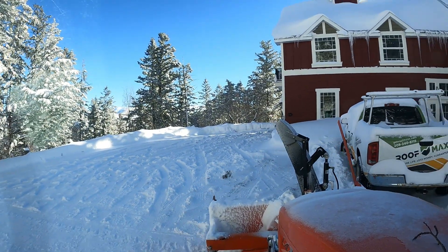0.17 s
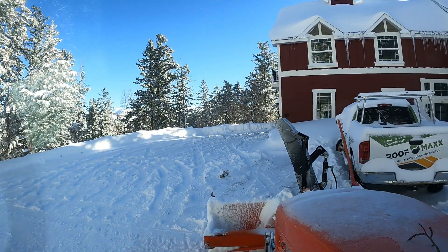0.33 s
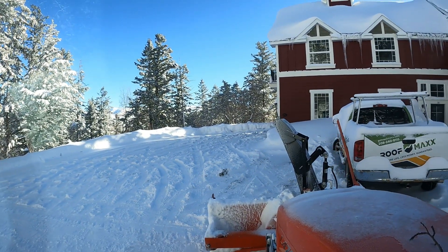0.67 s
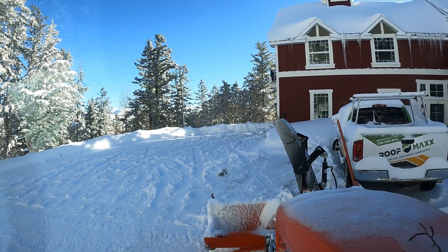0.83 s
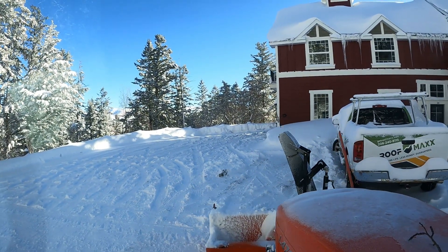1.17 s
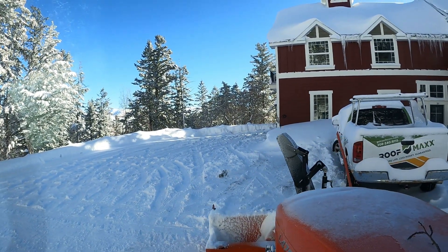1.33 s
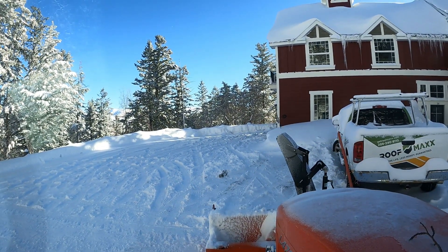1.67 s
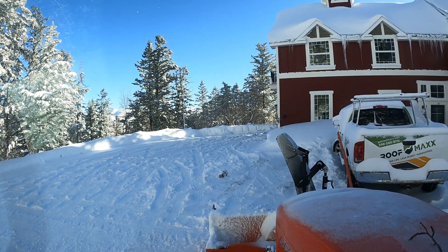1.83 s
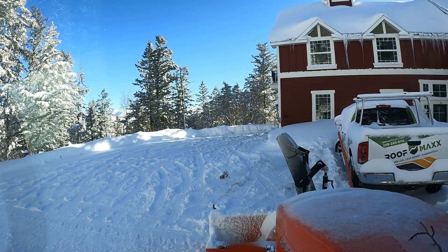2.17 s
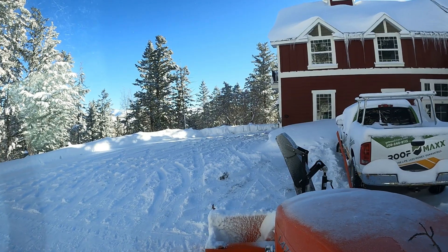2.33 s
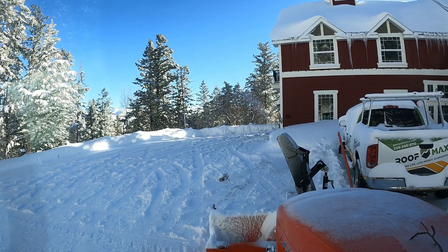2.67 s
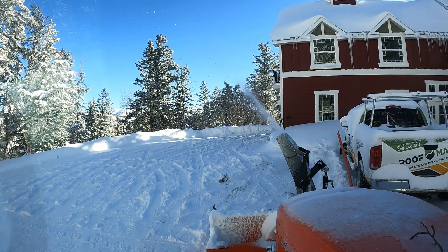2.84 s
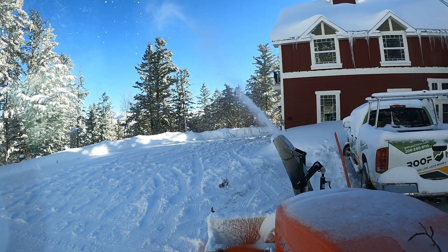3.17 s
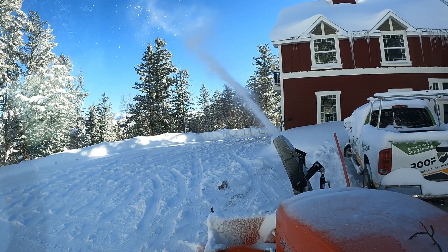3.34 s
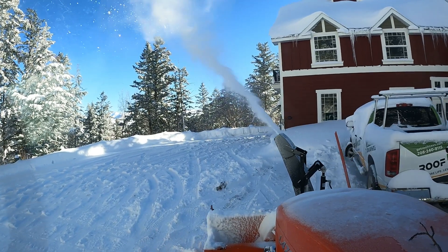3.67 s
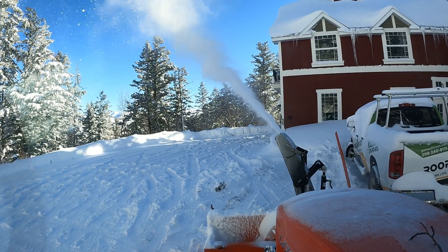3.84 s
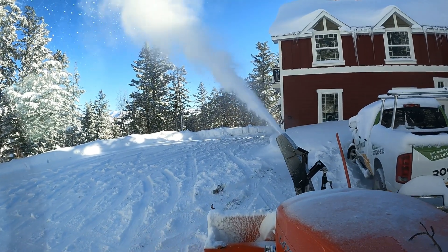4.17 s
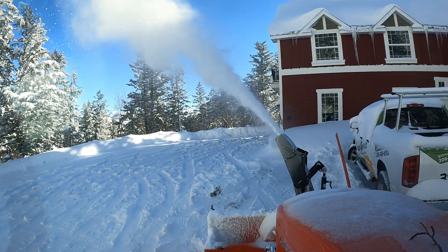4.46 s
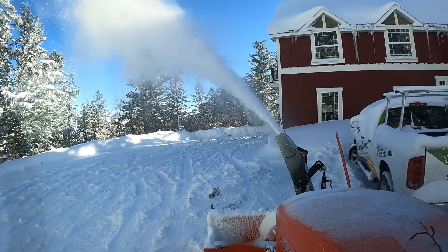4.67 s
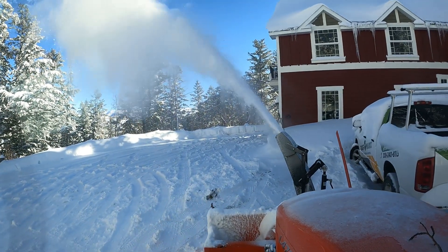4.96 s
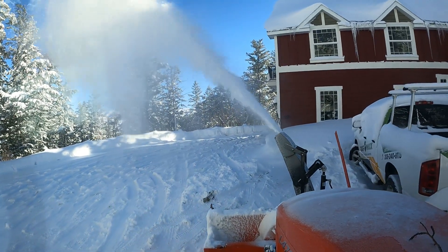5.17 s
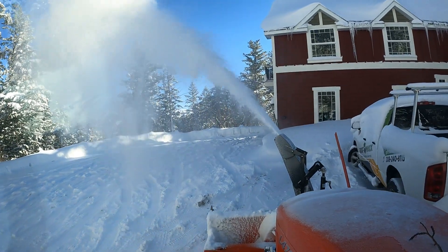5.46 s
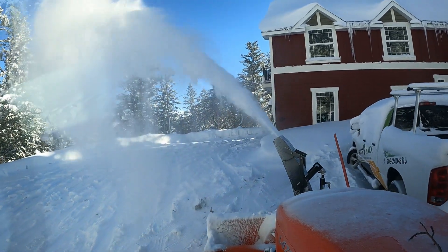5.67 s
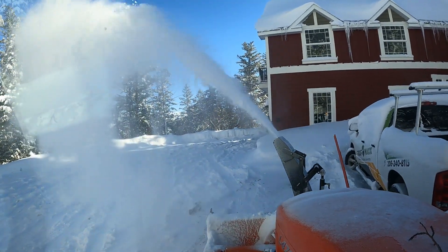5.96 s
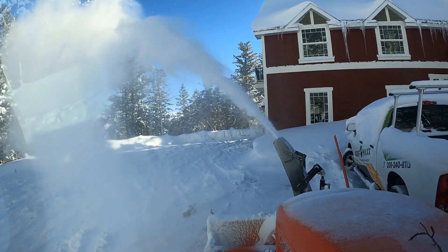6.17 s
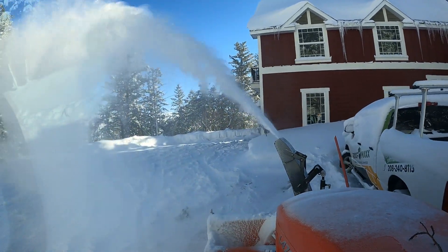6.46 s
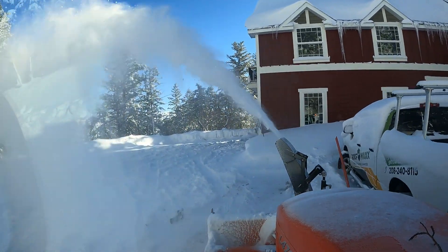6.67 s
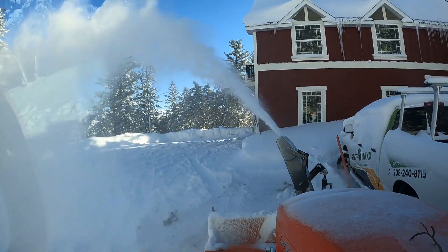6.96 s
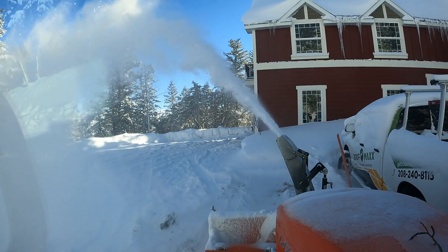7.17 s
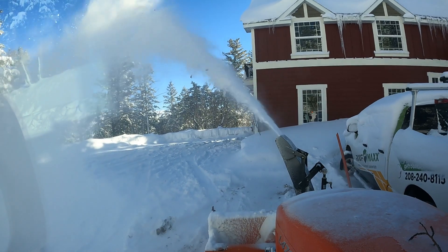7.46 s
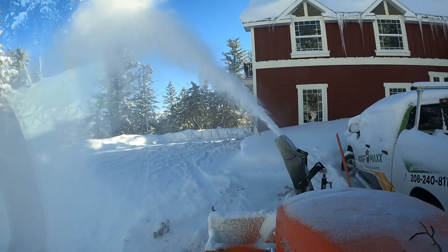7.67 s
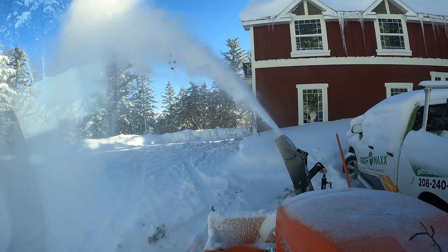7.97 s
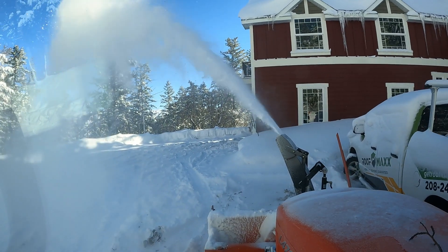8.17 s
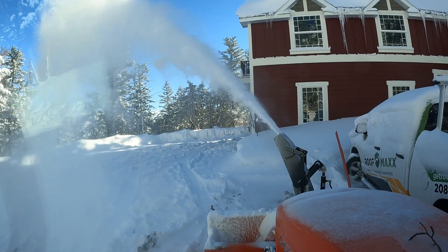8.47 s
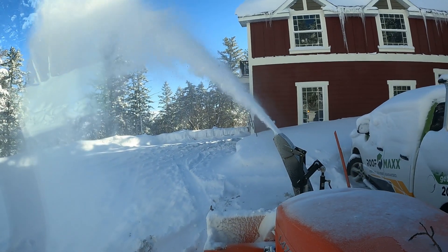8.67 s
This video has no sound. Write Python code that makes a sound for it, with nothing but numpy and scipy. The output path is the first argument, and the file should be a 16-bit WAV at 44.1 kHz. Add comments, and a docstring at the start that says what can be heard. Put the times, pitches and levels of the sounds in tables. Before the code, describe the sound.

Steady tractor and snow blower noise fills a small cab: low uneven rumble, humming panels, muffled broadband roar and a mid-pitched pump whine. Early on, hard lever knocks come in pairs and bursts, the last with dry squeaking and scraping, and the sound ducks slightly before recovering. The machine continues alone until a compact rattle of clunks and light ticks past the middle, then drones on to the end. Close stereo microphone inside.

```python
"""A four-cylinder tractor engine driving a snow blower, heard inside the closed cab.
Engine orders, pump whine and gear tones are wavering sines locked to the shaft; the roar is coloured noise
that beats with the firings and comes dull through the glass. The cab booms and shakes as noise-driven modes.
Levers and loose fittings knock, squeak and scrape now and then: noise bursts, decaying or sustained modes.
After some of the lever work the whole level dips and creeps back."""
import sys
import numpy as np
from scipy import signal
from scipy.fft import rfft, irfft, next_fast_len
from scipy.io import wavfile
from scipy.ndimage import uniform_filter1d

SR = 44100
rng = np.random.default_rng(int(sys.argv[2]) if len(sys.argv) > 2 else 0)


def ratio(d):
    """dB to gain"""
    e = np.asarray(d, float) / 20
    return 10 ** e


def master(y):
    """Save y as 16-bit WAV."""
    cut = np.clip(np.atleast_2d(y).T, -1, 1)
    pcm = np.round(cut * 32767)  # scale
    wavfile.write(sys.argv[1], SR, pcm.astype(np.int16))


N = 388521
TIME = np.arange(N) / SR


def unit(x):
    """Scale to an rms of one."""
    return x / np.sqrt(np.mean(x ** 2))


def colour(x, points):
    """Shape the spectrum along (Hz, dB) points on a log axis."""
    size = next_fast_len(x.shape[-1])
    hz, db = np.transpose(points)
    log_hz = np.log(np.arange(size // 2 + 1) * SR / size + 1)
    gain = ratio(np.interp(log_hz, np.log(hz), db))
    return irfft(rfft(x, size) * gain, size)[..., :x.shape[-1]]


def ring(x, hz, width_hz):
    """One resonance, gain one at its centre."""
    return signal.lfilter(*signal.iirpeak(hz, hz / width_hz, fs=SR), x)


def ring_twice(x, hz, width_hz):
    """Two equal resonances in series: steeper skirts."""
    return ring(ring(x, hz, width_hz), hz, width_hz)


def walk(rate_hz):
    """Random levels held 1 / rate_hz and slewed twice; spread one."""
    step = 32
    hold = int(SR / rate_hz / step)
    held = np.repeat(rng.standard_normal(N // step // hold + 2), hold)
    slewed = uniform_filter1d(uniform_filter1d(held, hold), hold)
    return np.interp(np.arange(N) / step, np.arange(len(slewed)), unit(slewed))


def pan(x, left_minus_right_db):
    """Set the level difference between left and right."""
    return x * ratio(np.array([[left_minus_right_db / 2], [-left_minus_right_db / 2]]))


def widen(mid, side):
    """Add a part of opposite sign on left and right."""
    return mid + side * np.array([[1], [-1]])


def tone(turns, waver_db, waver_rad):
    """A partial of rms near one whose level and phase waver."""
    phase = 2 * np.pi * (turns + rng.random()) + waver_rad * walk(3.0)
    return np.sqrt(2) * ratio(waver_db * walk(6.0)) * np.sin(phase)


# dips of the whole level: start_s, strength_db (the depth reached is less)
DIPS = [(0.521, 2.1), (1.47, 6.5), (5.27, 2)]


def dips_db():
    """Level in dB: a quick exponential fall times a slow exponential recovery."""
    fall_tau_s, recover_tau_s = 0.064, 0.57
    total_db = np.zeros(N)
    for start_s, strength_db in DIPS:
        since_s = np.maximum(TIME - start_s, 0)
        fall = 1 - np.exp(-since_s / fall_tau_s)
        total_db -= strength_db * fall * np.exp(-since_s / recover_tau_s)
    return total_db


# lever dragging in its gate: start_s, length_s, centre_hz, width_hz (per pass), level_db
SCRAPES = [(1.251, 0.22, 3500, 5000, -51.5), (5.21, .11, 9000, 8000, -61)]


def scrapes():
    """Uneven grains of friction in a wide band."""
    out = np.zeros((2, N))
    for start_s, length_s, hz, width_hz, level_db in SCRAPES:
        i, t = int(start_s * SR), np.arange(int(length_s * SR)) / SR
        mid, side = ring_twice(rng.standard_normal((2, len(t))), hz, width_hz)
        fade = np.clip(np.minimum(t, length_s - t) / 0.012, 0, 1)
        grains = ratio(3.5 * walk(92.0)[:len(t)]) * fade
        out[:, i:i + len(t)] += ratio(level_db) * grains * widen(unit(mid), 0.5 * unit(side))
    return out


# squeaks and creaks of dry pivots: start_s, length_s, pitch_hz, width_hz (per pass), level_db
SQUEAKS = [(1.0, .2, 7350, 40, -67), (1.202, .03, 1390, 60, -34), (1.25, 0.024, 2650, 120, -34),
           (1.255, 0.018, 1260, 60, -31), (1.272, 0.061, 1740, 30, -34), (1.272, 0.029, 7780, 100, -43),
           (1.28, .012, 8100, 100, -48), (1.274, .015, 5300, 120, -43), (1.305, .03, 5900, 150, -47),
           (1.336, 0.04, 7780, 40, -41.5), (1.385, .03, 7770, 60, -49), (1.345, 0.02, 5280, 100, -44),
           (1.37, .03, 5300, 150, -52), (1.35, .05, 8400, 80, -55), (1.352, 0.03, 5850, 250, -52),
           (1.412, 0.027, 5930, 250, -47), (1.464, 0.028, 2070, 100, -40), (4.157, 0.027, 9420, 150, -55),
           (5.205, .02, 14700, 398, -60), (5.28, .045, 14300, 500, -63), (5.393, .014, 14100, 500, -47),
           (8.4, 0.14, 7700, 40, -62)]


def squeaks():
    """Stick-slip keeps one narrow mode singing steadily for a moment; the panes spread it a little."""
    rise_s, t60_s, tail_s, level_window_s = 0.008, 0.08, 0.065, 0.009
    out = np.zeros((2, N))
    for start_s, length_s, hz, width_hz, level_db in SQUEAKS:
        i, t = int(start_s * SR), np.arange(int((length_s + tail_s) * SR)) / SR
        shape = np.minimum(t / rise_s, 1) * ratio(-60 * np.maximum(t - length_s, 0) / t60_s)
        mode, spread = ring_twice(rng.standard_normal((2, SR // 2)), hz, width_hz)
        steady = mode / np.sqrt(uniform_filter1d(mode ** 2, int(level_window_s * SR)))
        # the end of the noise, where the mode has built up
        sung = widen(steady, 0.37 * unit(spread))[:, -len(t):]
        out[:, i:i + len(t)] += ratio(level_db) * shape * sung
    return out


# free modes of the struck linkage: pitch_hz (nominal), t60_s, level_db (relative, nominal)
LINKAGE = [(135, 0.26, 0), (280, 0.21, -3), (396, 0.18, -6), (1035, .16, -4), (1186, 0.061, 0),
           (1390, 0.14, -11), (1600, 0.18, -2), (1886, 0.1, 0.5), (2110, .1, -2), (2330, 0.065, 1.5),
           (2850, 0.072, 2), (3200, .08, -2), (3500, .12, -3), (3890, 0.07, 3), (4280, .08, 0),
           (4920, .07, -2)]


def clang(t, rise_ms, bright_hz):
    """Linkage modes decay freely; those near the brightest pitch of the blow ring most."""
    ring_spread_oct, scatter_db, detune = 0.33, 0.61, 0.004
    hz, t60_s, level_db = np.transpose(LINKAGE)[:, :, None]
    chance = rng.standard_normal((3, len(LINKAGE), 1))
    nearness = np.exp(-(np.log2(hz / bright_hz) / ring_spread_oct) ** 2 / 2)
    gain = ratio(level_db + scatter_db * chance[0]) * nearness
    phase = 2 * np.pi * (hz * (1 + detune * chance[1]) * t + chance[2])
    modes = gain * ratio(-60 * t / t60_s) * np.sin(phase)
    return np.minimum(t * 1000 / rise_ms, 1) * modes.sum(axis=0) * np.sqrt(2 / np.sum(gain ** 2))


# lever resonances: centre_hz, width_hz, level_db (relative to each other)
LEVER = [(338, 37, 0.5), (1020, 110, 5), (1530, 190, 5), (2260, 250, 0.5), (2870, 710, -6.5),
         (3770, 2000, 1.5), (4600, 210, -19)]
# blows: start_s, level_db, top_hz, tilt_db_per_octave (above 700 Hz), rise_ms, left_minus_right_db,
# ring_db, bright_hz
KNOCKS = [(0.346, -22, 6500, -5, 3, -1, -26, 2900), (.366, -31, 5500, -12, 2, -2, -39, 3700),
          (.352, -32, 3000, -3, 2.6, -2, -26.5, 1590), (0.474, -22, 4300, -8, 7.3, 2, -40, 2300),
          (.501, -22.5, 7100, -2.5, 1.5, -3, -22.5, 2700), (.512, -22, 5000, -7, 3.1, 0, -29, 1500),
          (.927, -29, 7600, -3.5, 3.2, 0, -42, 2500), (1.258, -26, 7800, -5.5, 6, -2, -26, 1300),
          (1.275, -27, 7800, -6.5, 4, -1, -25, 1700), (1.342, -23, 4500, -7, 3.2, -2, -26, 2300),
          (1.388, -29, 3500, -6, 3, 0.5, -31, 1040), (1.428, -27.5, 7600, -6.5, 3, 0, -32, 1350),
          (1.458, -23, 2550, -5, 7, -3, -31, 2050), (1.465, -28, 1800, -2, 3, 1, -27, 1020),
          (5.206, -35, 15000, 0.5, 1.5, 1, -50, 4000), (5.228, -40, 8500, 9, 3, -11, -50, 4000),
          (5.244, -26, 6240, -2, 1.5, 1, -25, 1920), (5.245, -33, 4970, -6, 2, -3, -30, 4000),
          (5.262, -40, 900, -11, 6, 1, -10, 135), (5.248, -24, 2000, -11, 2, -2, -22, 1200),
          (5.258, -32, 1500, -6, 3.4, -1, -23, 1020), (5.254, -30, 900, -11.5, 7, 3, -17, 300),
          (5.280, -43, 13000, 1, 3, -1, -50, 4000), (5.39, -36, 7850, 9, 5, 1, -50, 4000),
          (5.404, -38, 7900, 9, 3, 1, -50, 4000), (5.392, -45, 12500, 1, 3, 0, -50, 4000)]


def knocks():
    """Blows on levers and linkage: a quick rise, a partly diffuse noisy tail and a clang."""
    base_t60_s, t60_s_per_rise_ms = 0.11, 0.0098  # slower blows die slower
    out = np.zeros((2, N))
    t = np.arange(int(0.3 * SR)) / SR
    for start_s, level_db, top_hz, tilt_db, rise_ms, side_db, ring_db, bright_hz in KNOCKS:
        noise = rng.standard_normal((2, len(t)))
        noise = noise + 2.1 * sum(ratio(db) * ring(noise, hz, width_hz) for hz, width_hz, db in LEVER)
        edge_db = tilt_db * np.log2(top_hz / 700)
        low = [(80, -12), (300, 3), (700, 0), (top_hz, edge_db)]
        cut = [(top_hz * 1.06, edge_db - 13), (top_hz * 1.75, edge_db - 19), (top_hz * 2.1, edge_db - 56)]
        shared, spread = colour(noise, low + cut)
        t60_s = base_t60_s + t60_s_per_rise_ms * rise_ms
        shape = np.minimum(t * 1000 / rise_ms, 1) * ratio(-60 * t / t60_s)
        blow = ratio(level_db) * shape * widen(unit(shared), 0.43 * unit(spread))
        i = int(start_s * SR)
        out[:, i:i + len(t)] += pan(blow + ratio(ring_db) * clang(t, rise_ms, bright_hz), side_db)
    return out


# brief random swells of the cab modes: peak_s, shake_db, drone_db, boom_db
SWELLS = [(.49, -16, -18.5, -38), (1.33, -18, -25, -20.5), (3.12, -30, -24, -18.5), (5.67, -30, -23, -32),
          (6.99, -19, -18, -37)]


def swells():
    """Bell-shaped swell strength of the three cab mode groups."""
    rise_sigma_s, fade_sigma_s = 0.035, 0.033
    total = np.zeros((3, N))
    for peak_s, *levels_db in SWELLS:
        sigma_s = np.where(TIME < peak_s, rise_sigma_s, fade_sigma_s)
        total += ratio(levels_db)[:, None] * np.exp(-((TIME - peak_s) / sigma_s) ** 2 / 2)
    return total


def cab_modes(modes, level_db, swell, even_s):
    """Road and engine shake the cab at random; modes ring, evened over even_s, firmer in a swell."""
    x = sum(ratio(db) * unit(ring_twice(rng.standard_normal(N), hz, width_hz)) for hz, width_hz, db in modes)
    slow_power = uniform_filter1d(x ** 2, int(even_s * SR))
    swell_power = uniform_filter1d(x ** 2, int(0.12 * SR))
    return x * np.sqrt(ratio(level_db) ** 2 / slow_power + swell ** 2 / swell_power)


# slow level of the cab mode groups: time_s, shake_db, drone_db, boom_db
CAB = [(0, -14, -26, -19), (.4, -18.5, -26.5, -24), (.9, -14.5, -28.5, -18), (1.2, -18.5, -26.5, -21),
       (1.65, -17, -26.5, -20.5), (2.25, -15, -36, -19.5), (2.9, -19, -26, -22.5),
       (3.45, -20.5, -30, -15.5), (3.75, -24, -25.5, -20), (4.1, -15, -29.5, -19.5),
       (4.5, -21.5, -24.5, -20.5), (4.95, -13, -38, -23.5), (5.4, -17.5, -25.5, -20.5),
       (5.9, -21, -25, -19.5), (6.65, -28, -22.5, -18.5), (7.15, -16, -28.5, -21.5), (7.7, -21, -29.5, -18),
       (8.35, -15, -31, -20), (8.81, -25.5, -24.5, -22.5)]
# air and panel modes of each group: centre_hz, width_hz (per pass), level_db (relative within the group)
SHAKE = [(18.3, 6.3, -11.5), (26.8, 2.8, 1), (36.7, 12.5, -11)]
DRONE = [(104.4, 36, -5), (135, 26.7, 0)]
BOOM = [(210.4, 21, -1.7), (226.4, 17.2, -0.32)]


def cab():
    """Shake, drone and boom of the cab's air and panels."""
    time_s, *levels = np.transpose(CAB)
    shake_db, drone_db, boom_db = (np.interp(TIME, time_s, level) for level in levels)
    shake_swell, drone_swell, boom_swell = swells()
    shake = cab_modes(SHAKE, shake_db, shake_swell, 0.18)
    drone = cab_modes(DRONE, drone_db, drone_swell, 0.28)
    return shake + drone + cab_modes(BOOM, boom_db, boom_swell, 0.29)


def cab_echo(x):
    """Dense reflections between the panes leave a fixed ripple of fine resonances."""
    t60_s, share = 0.17, 0.02  # share of power
    t = np.arange(int(0.2 * SR)) / SR
    tail = colour(rng.standard_normal(len(t)), [(300, -34), (700, 6.0), (20000, 3.5)]) * ratio(-60 * t / t60_s)
    echo = signal.fftconvolve(x, tail / np.linalg.norm(tail))[:N]
    return np.sqrt(1 - share) * x + np.sqrt(share) * echo


# load on the blower drive: time_s, load_db
GEAR_LOAD = [(0, 1), (2.5, 3), (3.5, 2), (4.5, -2), (5.6, -1), (6.2, 4.5), (7.8, 3.5), (8.81, 1.5)]


def blower_load_db():
    """Load of the blower drive, sets mesh tones and pane ringing."""
    return np.interp(TIME, *np.transpose(GEAR_LOAD))


# glass and panel resonances in the roar: centre_hz, width_hz, level_db (before load)
PANES = [(925, 55, -8), (1072, 60, -5.5), (1228, 18, 0.5), (1374, 46, -0.5), (1618, 40, -7.5),
         (2070, 25, -19), (2500, 86, -10.5), (2850, 38, -9.5), (4140, 350, -10.5), (4470, 30, -3),
         (4920, 27, -2), (5330, 25, -2), (5986, 30, 0.5), (7560, 23, -4), (9593, 40, 2), (11200, 74, -11)]
# spectrum of the roar common to left and right: freq_hz, density_db (relative)
ROAR = [(12, 12), (60, 12.5), (180, 10.5), (290, 10.5), (360, 3), (520, 4), (650, -1), (830, -5.5),
        (960, -1.5), (1050, -6), (1600, -7.5), (2000, -10), (3200, -17.5), (5000, -24), (7600, -30.5),
        (8600, -37), (11300, -39), (13400, -50), (14200, -63)]
# spectrum of the part that differs left to right: freq_hz, density_db (relative)
DIFFUSE = [(12, -3), (40, -5.5), (150, -8.5), (500, -8), (850, -14.5), (1900, -17.5), (2700, -18),
           (5000, -31.5), (8000, -40.5), (12000, -47), (14000, -55)]


def roar(cycles):
    """Combustion clatter, fan and snow in the chute; block rattles per firing, panes ring more under load."""
    clatter_db, scatter_db, fade_firings = 5, 2.5, 0.35
    shared, left_right = rng.standard_normal((2, N))
    firings = 4 * cycles
    strength_db = clatter_db + scatter_db * rng.standard_normal(N // 100)[firings.astype(int)]
    beat = ratio(strength_db * np.exp(-(firings % 1) / fade_firings) + 0.5 * walk(12.0))
    block = signal.butter(2, [1200, 3200], "band", fs=SR)
    shared = shared + (unit(beat) - 1) * signal.lfilter(*block, shared)
    load = ratio(blower_load_db() + 1.7 * walk(1.26))
    shared = shared + load * sum(ratio(db) * ring(shared, hz, width_hz) for hz, width_hz, db in PANES)
    noise = widen(colour(cab_echo(shared), ROAR), colour(left_right, DIFFUSE))
    # level reference: 600-4000 Hz of the mean of left and right
    band = signal.butter(4, [600, 4000], "band", fs=SR, output="sos")
    return noise / signal.sosfilt(band, noise.mean(axis=0)).std()


# multiples of the gear mesh rate: order, level_db (before load), left_minus_right_db
GEARS = [(6, -47.5, 1.5), (9, -51.5, 0), (10, -59.5, 13), (11, -61.5, -6.5), (12, -63, -6)]


def gears(shaft_hz):
    """Mesh tones of the blower drive, stronger as the chute fills, and a low accessory hum."""
    mesh_per_turn, hum_hz, hum_db = 5.073, 59, -38
    teeth = mesh_per_turn * np.cumsum(shaft_hz) / SR
    mesh = sum(ratio(db) * pan(tone(k * teeth, 0.9, 0.1 * k), side_db) for k, db, side_db in GEARS)
    return ratio(blower_load_db()) * mesh + ratio(hum_db) * tone(hum_hz * TIME, 3.5, 0.35)


# multiples of the pump shaft: order, level_db (re the whine), left_minus_right_db
PUMP = [(8, 0.5, 0), (9.02, -6, -2), (15.79, -18.5, -11), (18.01, -6.5, 4.5), (20.38, -17, 3),
        (24.05, -20.5, 13), (26.9, -20, -2), (31.9, -17, 5.5), (40, -21, -3)]


def pump(shaft_hz, whine_db):
    """Gear and piston pulses of the hydraulics, following the tractor shaft, which shudders a little."""
    shudder_turns, waver_db = 0.003, 0.7
    turns = np.cumsum(shaft_hz) / SR + shudder_turns * walk(25.0)
    whine = sum(ratio(db) * pan(tone(k * turns, 1.0, 0.029 * k), side_db) for k, db, side_db in PUMP)
    return ratio(whine_db + waver_db * walk(6.4)) * whine


# speed of the tractor pump shaft: time_s, shaft_hz
SHAFT = [(0, 52.1), (.3, 51.99), (.55, 51.63), (.85, 51.57), (1.1, 50.67), (1.4, 51.12), (1.75, 51.67),
         (2.2, 50.95), (2.7, 50.85), (3.1, 51.15), (4, 51.11), (5.05, 51.11), (5.45, 51.24), (5.9, 51.31),
         (6.7, 50.95), (7.4, 51.08), (8.1, 51.19), (8.81, 51.15)]


def shaft_speed_hz():
    """Wandering speed that engine, pump and gears share."""
    return np.interp(TIME, *np.transpose(SHAFT))


def engine_cycles(shaft_hz):
    """Engine cycles elapsed; the pump is geared to the crank."""
    pump_turns_per_cycle = 3.021
    return np.cumsum(shaft_hz) / SR / pump_turns_per_cycle


# level of the engine lines: time_s, load_db
ENGINE_LOAD = [(0, -1), (1.2, -0.5), (2.2, -1), (3.5, 1.5), (6, -0.5), (8.81, 0.5)]
# multiples of the engine cycle: order, level_db (before load)
ENGINE = [(4, -40), (5, -42.5), (6, -41.5), (7, -44), (8, -35), (11, -45.5), (12, -38), (13, -33.5),
          (15, -45), (16, -47), (17, -35.5), (18, -43), (19, -40.5), (20, -43), (25, -48), (28, -43),
          (29, -50), (30, -45.5), (31, -44.5), (32, -38.5), (33, -46), (36, -46), (38, -53), (41, -48),
          (42, -45.5), (45, -54.5), (46, -46), (60, -51), (64, -48), (68, -53), (70, -58), (76, -53),
          (77, -49), (80, -48.5), (84, -60.5), (88, -50), (100, -51.5)]


def engine(cycles):
    """Uneven cylinders leave lines at multiples of the cycle, firmer under load."""
    load = ratio(np.interp(TIME, *np.transpose(ENGINE_LOAD)))
    return load * sum(ratio(db) * tone(order * cycles, 1.46, 0.47) for order, db in ENGINE)


# levels outside the glass: time_s, roar_db, whine_db
OUTSIDE = [(0, -32.5, -32.5), (0.999, -31.5, -33.5), (2.6, -31, -31.5), (4, -31, -31.5), (6.0, -31, -32),
           (6.798, -30, -32), (7.6, -31.5, -32), (8.4, -31.5, -30), (8.81, -31.5, -35)]


def scene():
    """Cab, fittings and machine, left and right."""
    time_s, *levels = np.transpose(OUTSIDE)
    roar_db, whine_db = (np.interp(TIME, time_s, level) for level in levels)
    fittings = scrapes() + squeaks() + knocks()
    shaft_hz = shaft_speed_hz()
    cycles = engine_cycles(shaft_hz)
    # roar, engine and gears swell together
    swell = ratio(roar_db - roar_db.mean())
    outside = ratio(roar_db) * roar(cycles) + swell * (gears(shaft_hz) + engine(cycles))
    return ratio(dips_db()) * (fittings + cab() + outside + pump(shaft_hz, whine_db))


# left-right difference of colour: freq_hz, left_minus_right_db
LEFT_LEAN = [(60, -.5), (200, 0), (320, .4), (740, 2.3), (1130, 3), (2600, .6), (4500, -.5), (8000, 2.5),
             (13000, .5)]


def lean(dry):
    """Left and right differ in colour, half the difference each way."""
    left = colour(dry[0], [(hz, db / 2) for hz, db in LEFT_LEAN])
    right = colour(dry[1], [(hz, -db / 2) for hz, db in LEFT_LEAN])
    return np.array([left, right])


def top_cut(x):
    """Nothing passes above the cut-off."""
    return signal.sosfilt(signal.butter(12, 15550, fs=SR, output="sos"), x)


def record(dry):
    """Colour left and right, round the peaks."""
    mix = np.tanh(1.077 * lean(dry)) / 1.141
    return top_cut(mix)


dry = scene()
out = record(dry)
master(out)
```